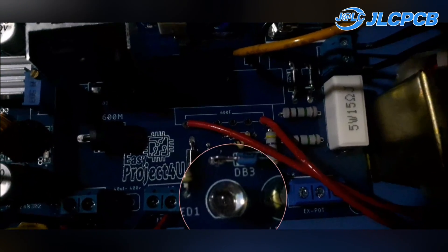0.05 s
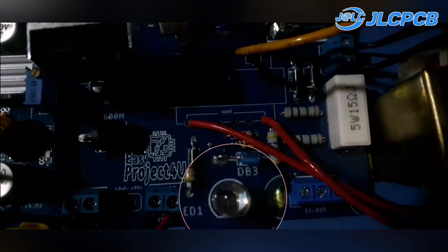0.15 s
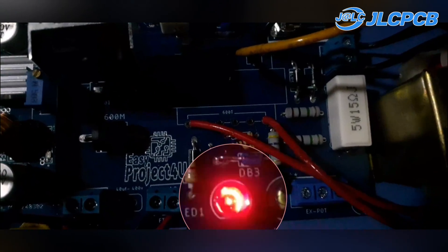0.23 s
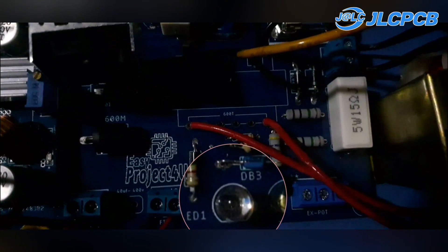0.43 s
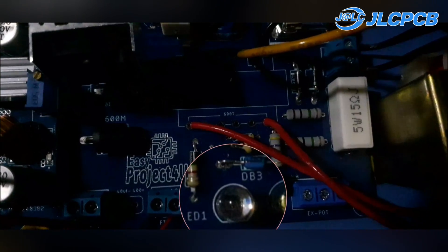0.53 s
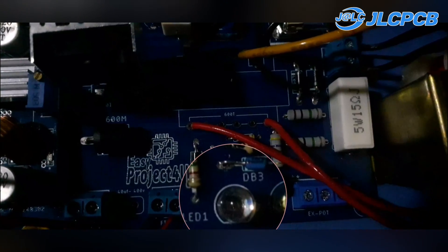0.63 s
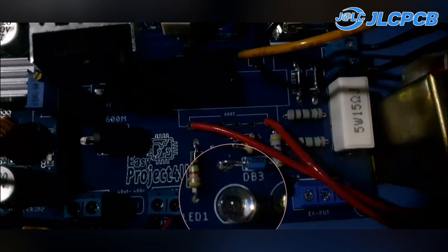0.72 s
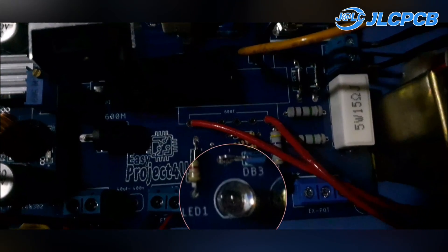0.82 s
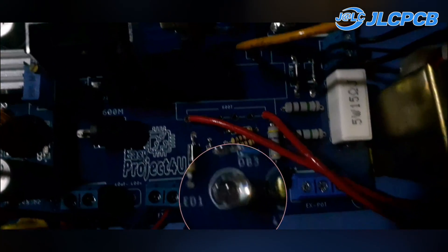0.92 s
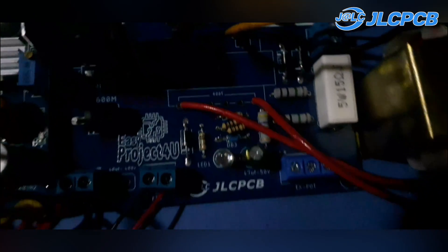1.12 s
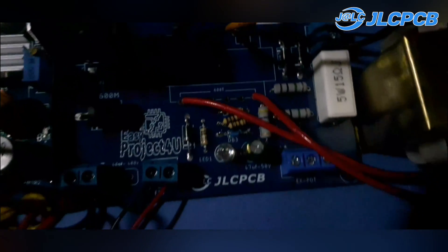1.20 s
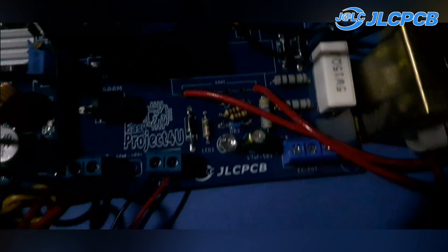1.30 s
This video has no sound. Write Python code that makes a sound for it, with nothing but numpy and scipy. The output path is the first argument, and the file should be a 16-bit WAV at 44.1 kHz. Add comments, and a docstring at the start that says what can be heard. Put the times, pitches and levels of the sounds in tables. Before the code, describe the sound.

Close up in a quiet room, a circuit's faint piercing whine and wavering low hum precede one bright spark crack; its short echo dies, then the whine restarts and descends in small steps.

```python
"""A spark snaps on a high-voltage board on a bench, close to a two-port microphone in a quiet room.
Clicks ring short resonances and puffs of air push the ports; noise dying band by band is the room's answer.
The converter's whine, a sine, drops out at the snap, restarts high and slides down as it recharges.
A wavering hum with fainter low tones, a fluttering high band and hiss lie beneath.
The microphone's low cut rings with the snap, and its gain control stays low afterwards."""
import sys
import numpy as np
from scipy import signal
from scipy.io import wavfile
from scipy.ndimage import uniform_filter1d

SR = 44100
rng = np.random.default_rng(int(sys.argv[2]) if len(sys.argv) > 2 else 0)


def persist_wave(psi):
    """Save psi, clipped to +-1, as 16-bit WAV."""
    counts = np.round(np.clip(psi, -1, 1) * 32767).astype(np.int16)
    wavfile.write(sys.argv[1], SR, np.atleast_2d(counts).T)


def attenuation_scalar(level_db):
    """Turn a level in dB into a linear amplitude multiplier (20 dB per decade)."""
    decades = np.asarray(level_db, float) / 20
    return 10 ** decades


N = 59535  # length in samples
SNAP_S = .2338


def evened(x):
    """Scales to rms 1."""
    return x / np.sqrt(np.mean(x ** 2) + 1e-20)


def smooth_noise(size):
    """Slow random motion of rms 1: white noise averaged twice over size samples."""
    return evened(uniform_filter1d(uniform_filter1d(rng.standard_normal(N), size=size), size=size))


def read(points, hz):
    """Reads a spectrum table on a log-frequency axis."""
    f, value = np.transpose(points)
    return np.interp(np.log(hz + 1), np.log(f + 1), value)


def curve(rows):
    """Columns of a time table, one value per sample."""
    rows = np.array(rows, float)
    return [np.interp(np.arange(N) / SR, rows[:, 0], col) for col in rows.T[1:]]


def resonate(x, hz, width_hz):
    """A resonance of gain 1: shifts hz down to zero, smooths, and shifts back up."""
    turn = np.exp(2j * np.pi * hz * np.arange(N) / SR)
    r = np.exp(-np.pi * width_hz / SR)
    return 2 * (turn * signal.lfilter([1 - r], [1, -r], x / turn)).real


def noise(colour, same, balance, patchy_db, size, shape_db=lambda hz, t: 0):
    """Two-port noise from random short spectra; rms 1 before shape_db is applied."""
    hop = size // 4
    frames, hz = N // hop + 5, np.fft.rfftfreq(size, 1 / SR)
    a, b, c, d, patches = rng.standard_normal((frames, len(hz), 5)).T
    # uneven patches in pitch and time
    patches = uniform_filter1d(patches, size=10, axis=0)
    patches = evened(uniform_filter1d(patches, size=10, axis=1))
    # the right port shares part of the left port's noise
    like = np.clip(read(same, hz), -1, 1)[:, None]
    left = a + 1j * b
    right = like * left + np.sqrt(1 - like ** 2) * (c + 1j * d)
    port_db = np.outer([.5, -.5], read(balance, hz))[:, :, None]
    spectra = np.array([left, right]) * attenuation_scalar(read(colour, hz)[:, None] + patchy_db * patches + port_db)

    def back(s):
        """Overlaps the short spectra into sound."""
        return signal.istft(s, nperseg=size, noverlap=size - hop)[1][:, :N]

    shaped = spectra * attenuation_scalar(shape_db(hz[:, None], np.arange(frames) * hop / SR))
    return back(shaped) / np.std(back(spectra))


def wavering(hz, width_hz, steady):
    """A drifting sine blended with narrow noise around the same pitch, rms 1."""
    wobble = evened(resonate(resonate(rng.standard_normal(N), hz, width_hz), hz, width_hz))
    drift = 1 + .018 * smooth_noise(1500)  # pitch ratio
    sine = np.sqrt(2) * np.sin(2 * np.pi * hz * np.cumsum(drift) / SR)
    return evened(steady * sine + (1 - steady) * wobble)


def hiss():
    """Steady background noise with its own colour, partly alike at the two ports."""
    # colour of the hiss: hz, relative_db (per Hz)
    colour = [(25, -18), (45, -30), (65, -42.5), (110, -20.5), (300, -17), (450, -23.5), (680, -27),
              (760, -34), (1200, -32), (1700, -39), (2200, -29), (3600, -43.5), (4600, -33), (6500, -39.5),
              (7600, -32.5), (8900, -40.5), (9300, -53.5), (11000, -48), (12900, -38.5), (13500, -53),
              (16500, -65)]
    # likeness of the two ports: hz, likeness (1 = identical)
    same = [(60, .13), (110, 0.077), (200, 0.6), (380, 0.23), (700, 0.44), (1300, 0.025), (16000, 0.0074)]
    # balance of the ports: hz, left_minus_right_db
    balance = [(60, -4), (110, -11.5), (200, -3.5), (1290, 0.46), (2400, -3), (4400, -7.5), (8100, -9.5),
               (15000, 10.5)]
    return attenuation_scalar(-60.5) * noise(colour, same, balance, patchy_db=1.5, size=1024)


def hum():
    """A wavering low tone and fainter ones, alike at both ports but stronger on the right."""
    # swelling and sinking of the hum: time_s, relative_db
    swell = [(0, -70), (.08, -63), (.11, -63), (.14, -52.5), (.18, -54.5), (.21, -48.5), (.28, -69),
             (.34, -52), (.38, -73), (.41, -52), (.46, -76.5), (.52, -61), (.56, -60.5), (.75, -57.5),
             (.81, -65), (.84, -52), (.88, -70), (.96, -52.5), (1.03, -55.5), (1.08, -63), (1.15, -67),
             (1.21, -74), (1.24, -54.5), (1.27, -65.5), (1.3, -56.5), (1.35, -51)]
    # faint low tones that come and go: start_s, length_s, pitch_hz, relative_db
    tones = [(0, 0.092, 516, -73), (0.45, 0.27, 534.7, -66), (0.606, 0.95, 498.3, -71),
             (0.733, 0.29, 429, -64), (0.787, 0.24, 662.5, -66.5), (1.13, 0.11, 413, -66.5),
             (1.271, 0.49, 547, -64)]
    t = np.arange(N) / SR
    out = attenuation_scalar(curve(swell)[0]) * wavering(204, width_hz=20, steady=.8)
    for start_s, length_s, hz, db in tones:
        progress = np.clip((t - start_s) / length_s, 0, 1)
        arch = np.sin(np.pi * progress ** 0.78)  # peaks a little before halfway
        out = out + attenuation_scalar(db) * arch * wavering(hz, width_hz=35, steady=.45)
    return attenuation_scalar(np.array([[-1.5], [1.4]])) * out


def flutter():
    """A narrow high band of hiss, separate at each port, whose level flutters at random on both together."""
    hz, width_hz, level_db, depth_db = 7510, 380, -65.5, 3
    beat = smooth_noise(200)
    band = [resonate(resonate(v, hz, width_hz), hz, width_hz) for v in rng.standard_normal((2, N))]
    return attenuation_scalar(level_db) * evened(np.array(band) * attenuation_scalar(depth_db * beat))


def whine():
    """The converter's sine, silent from snap to restart, then shaky with an octave below it for a moment."""
    # pitch, restarting high and coming down in steps: time_s, pitch_hz
    pitch = [(0, 11865), (.24, 11865), (.55, 15690), (.584, 15520), (.588, 15120), (.617, 14960),
             (.621, 14020), (.635, 13720), (.65, 13560), (.675, 13400), (.71, 13290), (.762, 13190),
             (.852, 13060), (.866, 12940), (.871, 12620), (.881, 12570), (.888, 12445), (1.006, 12395),
             (1.013, 12245), (1.074, 12215), (1.082, 12140), (1.14, 11995), (1.156, 11865), (1.35, 11865)]
    # strength and side: time_s, relative_db, left_minus_right_db
    strength = [(0, -62, 4), (.116, -61.5, 6.5), (.225, -60.5, 9.5), (.545, -83, -0.5), (.562, -60.5, -5),
                (.586, -67, 10), (.612, -63, 3), (.62, -71, 8), (.63, -57, 0), (.65, -61, 14),
                (.704, -60, 31), (.766, -66.5, 7), (.796, -67.5, 19), (.852, -57.5, 6.5), (.884, -62, 13),
                (.916, -56, 31), (.99, -59, 35.5), (1.034, -56.5, 10), (1.144, -61, 5), (1.176, -60, 22),
                (1.35, -61.5, 20.5)]
    restart_s, shaky_from_s, shaky_until_s = .54, .585, .62
    shake_hz, half_db = 190, -9  # rms pitch shake; octave below, relative to the whine
    t = np.arange(N) / SR
    (hz,), (level_db, pan_db) = curve(pitch), curve(strength)
    shake = evened(uniform_filter1d(rng.standard_normal(N), size=60))
    shake = shake * (t > shaky_from_s) * (t < shaky_until_s)
    turn = 2 * np.pi * np.cumsum(hz + shake_hz * shake) / SR
    on = uniform_filter1d(1. * ((t < SNAP_S) | (t > restart_s)), size=90)
    left = 1 / np.sqrt(1 + attenuation_scalar(-2 * pan_db))  # the ports' summed power does not change with side
    tone = np.array([left * np.sin(turn), left * attenuation_scalar(-pan_db) * np.cos(turn)])
    # skipped cycles sound an octave below while it restarts
    half = attenuation_scalar(half_db) * (t > restart_s) * (t < shaky_until_s) * np.sin(turn / 2)
    return on * np.sqrt(8) * attenuation_scalar(level_db) * (tone + half)


def room():
    """Dense bounces off the bench die fast; the room's tail builds up and dies band by band."""
    # colour of the room's answer: hz, relative_db (per Hz)
    colour = [(120, -21), (200, 9.5), (274, -13.5), (503, -7), (750, -7.5), (1090, -11.5), (2200, -5.5),
              (2750, -8), (3500, -6), (4000, -9), (4700, -12), (8030, -1), (10400, -2), (15300, -7.5),
              (16500, -30.5)]
    # decay of the tail: hz, t60_s
    decay = [(200, .2), (600, .42), (1400, .48), (3700, .52), (7700, .46), (11000, .37), (16000, .3)]
    # likeness of the two ports: hz, likeness (1 = identical)
    same = [(200, 0.77), (640, 0.43), (1400, .02), (16000, 0.0093)]
    # balance of the ports: hz, left_minus_right_db
    balance = [(200, -1.5), (1400, 0.5), (7000, -4), (15000, 8)]
    near_db, near_t60_s, far_db, far_rise_s = -16, 0.068, -21.5, 0.0087

    def tail_db(hz, s):
        """Each band falls 60 dB in its own t60 after the snap."""
        return -60 * np.maximum(s - SNAP_S, 0) / read(decay, hz)

    t = np.maximum(np.arange(N) / SR - SNAP_S, 0)  # time since the snap
    near = noise(colour, same, balance, patchy_db=-0.5, size=128)
    near = near * attenuation_scalar(near_db - 60 * t / near_t60_s) * (t > 0)
    far = noise(colour, same, balance, patchy_db=0.6, size=512, shape_db=tail_db)
    return near + attenuation_scalar(far_db) * far * (1 - np.exp(-t / far_rise_s))


def pushes():
    """Short bell-shaped puffs of air pressure, not the same at the two ports."""
    # puffs, negative is suction: time_s, width_s (standard deviation), left and right relative pressure
    puffs = [(.23382, .0003, -.18, 0), (.23455, .00025, 0, -.23), (.23515, .00055, .22, 0),
             (.23535, .00055, 0, .24), (.2377, .00045, .23, .01)]
    t = np.arange(N) / SR
    out = np.zeros((2, N))
    for s, width_s, left, right in puffs:
        out += np.array([[left], [right]]) * np.exp(-.5 * ((t - s) / width_s) ** 2)
    return attenuation_scalar(8.5) * out


def crack():
    """The snap: each arrival at the microphone is a click that rings the same short resonances."""
    # the snap and its first bounces off board and bench: time_s, left and right relative pressure
    arrivals = [(.23355, .2, .15), (.23374, -.55, .25), (.23387, .25, -.7), (.23408, -.55, .3),
                (.23428, .45, .25), (.23447, .4, -.35), (.23474, -.3, -.55), (.23492, .4, .4),
                (.23516, .2, .5), (.23562, .22, .3), (.23688, -.3, -.15), (.23748, .3, -.12),
                (.23862, -.22, .1)]
    # what each click rings with: pitch_hz, left_relative_db, right_relative_db, t60_s
    rings = [(1242, -15.5, -29, 0.017), (1600, -18.5, -12.5, 0.013), (2330, -4.5, -3, 0.0047),
             (3390, -14.5, -11.5, 0.0025), (5300, -4.5, -6, 0.003), (7400, -17.5, -27, 0.004),
             (8590, -10.5, 2.5, 0.0024), (9900, -19.5, -16, 0.001103), (11800, -5, -21.5, 0.011),
             (15500, -14, -21, 0.0025)]
    clicks, t = np.zeros((2, N)), np.arange(1024) / SR
    for s, *pressure in arrivals:
        clicks[:, round(s * SR)] = pressure
    ring = np.zeros((2, len(t)))
    for hz, left_db, right_db, t60_s in rings:
        ring += attenuation_scalar(np.array([[left_db], [right_db]]) - 60 * t / t60_s) * np.cos(2 * np.pi * hz * t)
    # no steady push: the first four samples cancel the sum
    ring = ring - ring.sum(1, keepdims=True) * (t < 4 / SR) / 4
    return attenuation_scalar(1) * signal.fftconvolve(clicks, ring, axes=1)[:, :N]


def scene():
    """Spark, room, converter and background at the two ports."""
    return crack() + pushes() + room() + whine() + hum() + flutter() + hiss()


def band_limit(x):
    """A steep low-pass at the top of the band."""
    return signal.sosfilt(signal.butter(12, 17030, fs=SR, output="sos"), x)


def record(dry):
    """Gain control drops at the snap and barely recovers; a steep low cut rings; the top is cut."""
    # low cut in two sections: cutoff_hz, q
    low_cut = [(44.8, 1.89), (65.6, 1.78)]
    knee_db, squeeze, recover_db_per_s = -26, 0.35, 5  # squeeze: dB taken off per dB over the knee
    power_db = 10 * np.log10(abs(uniform_filter1d((dry ** 2).mean(0), size=44)) + 1e-12)
    # the held peak level sinks at the recovery rate
    fall = np.arange(N) * recover_db_per_s / SR
    held_db = np.maximum.accumulate(power_db + fall) - fall
    out = dry / attenuation_scalar(squeeze * np.maximum(held_db - knee_db, 0))
    for hz, q in low_cut:
        w = 2 * np.pi * hz
        out = signal.lfilter(*signal.bilinear([1, 0, 0], [1, w / q, w * w], SR), out)
    out = signal.oaconvolve(out, signal.firwin(255, 15800, fs=SR)[None], "same")  # top edge in Hz
    return band_limit(out)


dry = scene()
out = record(dry)
persist_wave(out)
```